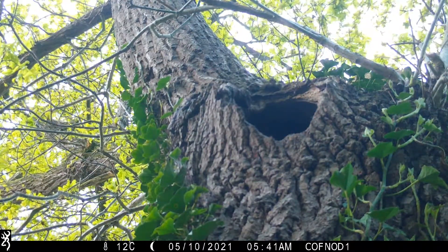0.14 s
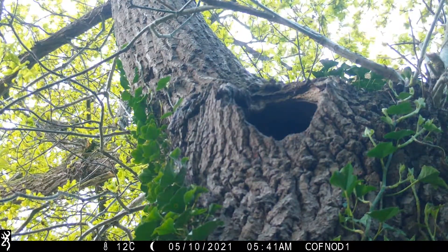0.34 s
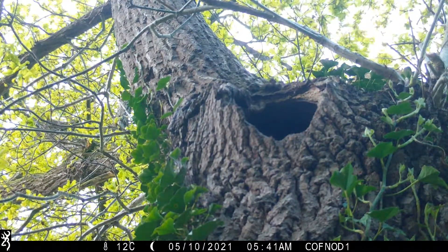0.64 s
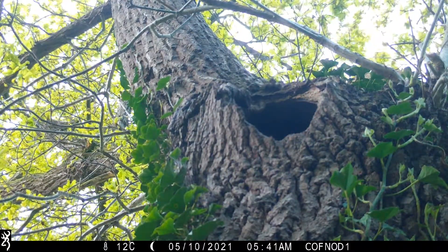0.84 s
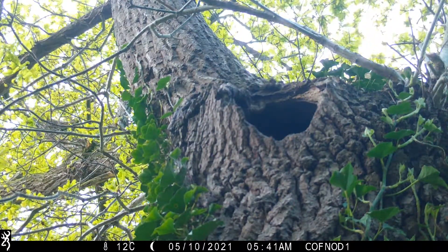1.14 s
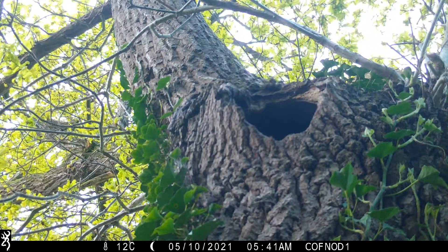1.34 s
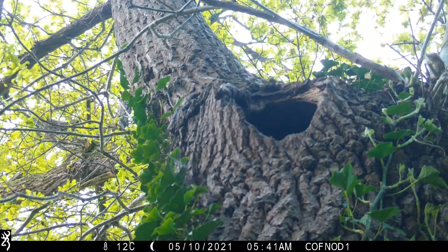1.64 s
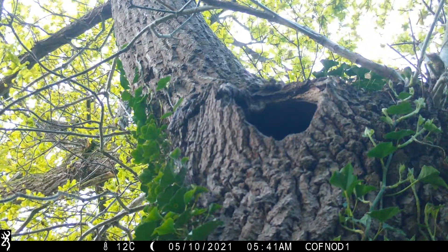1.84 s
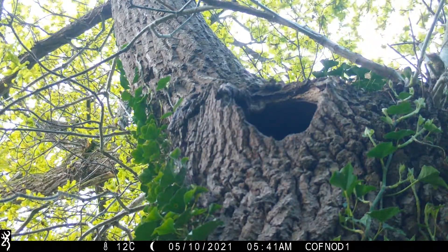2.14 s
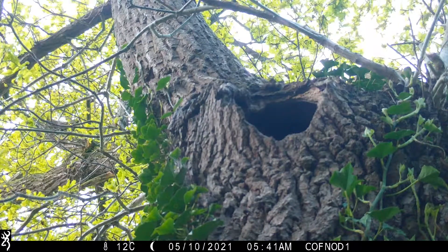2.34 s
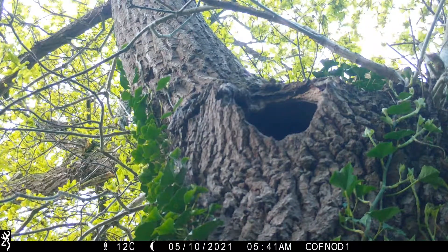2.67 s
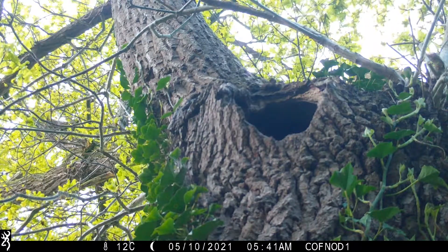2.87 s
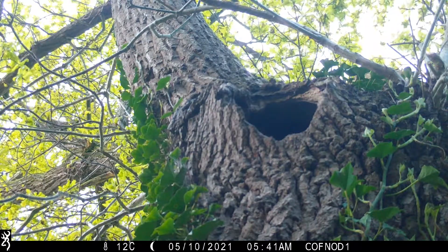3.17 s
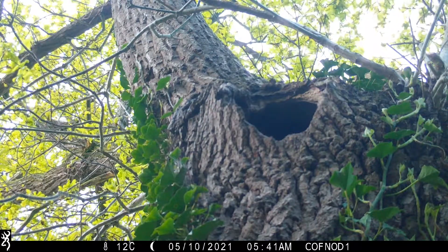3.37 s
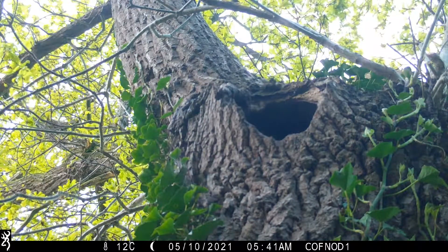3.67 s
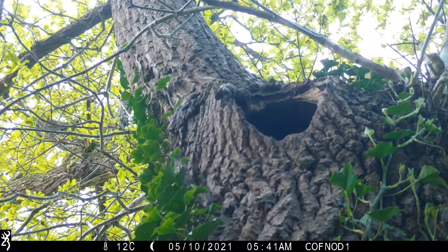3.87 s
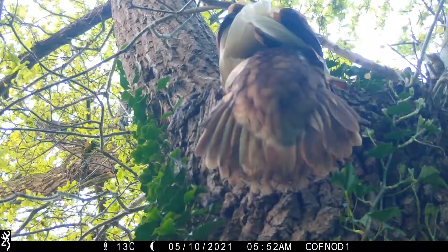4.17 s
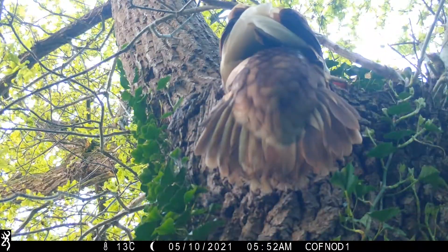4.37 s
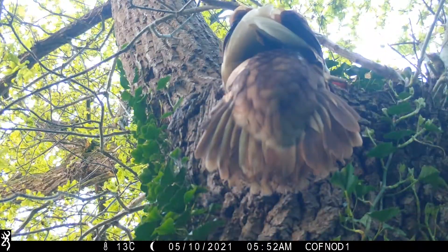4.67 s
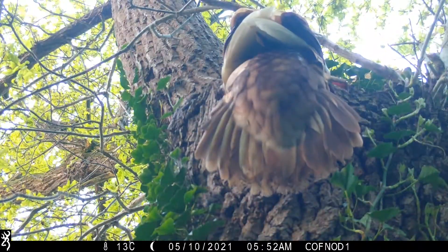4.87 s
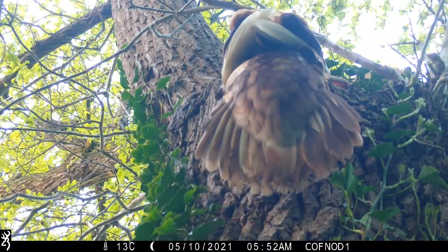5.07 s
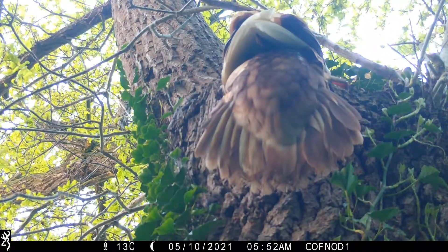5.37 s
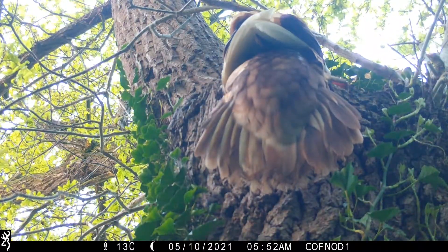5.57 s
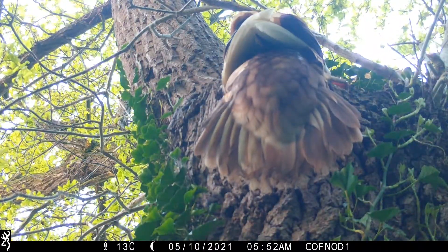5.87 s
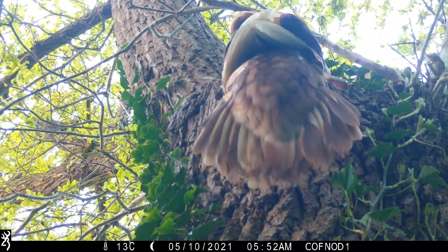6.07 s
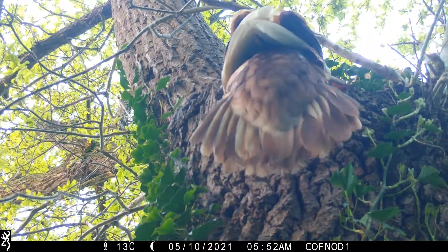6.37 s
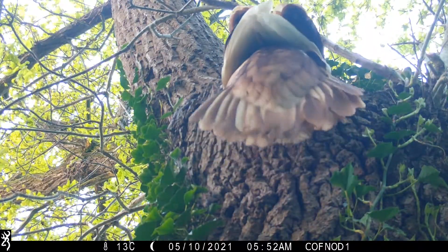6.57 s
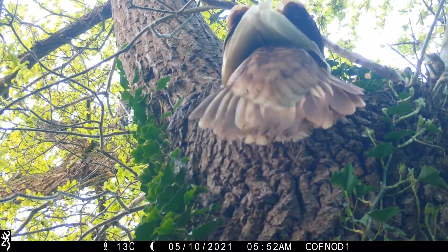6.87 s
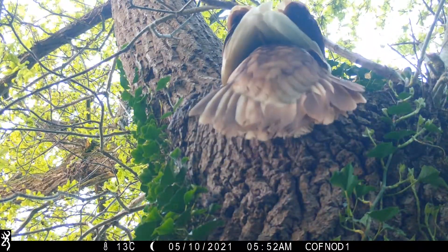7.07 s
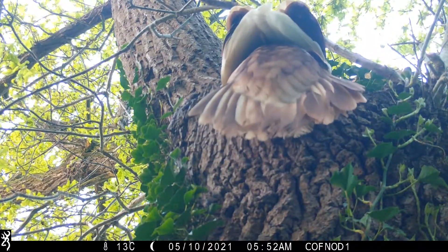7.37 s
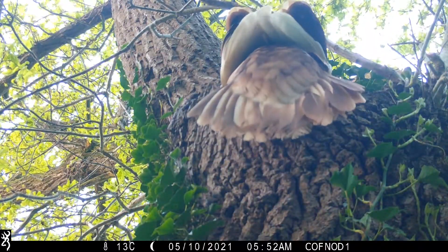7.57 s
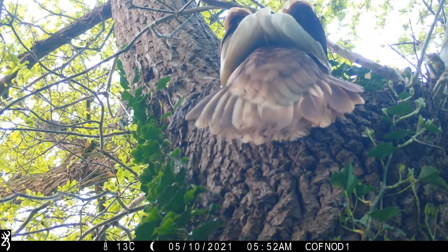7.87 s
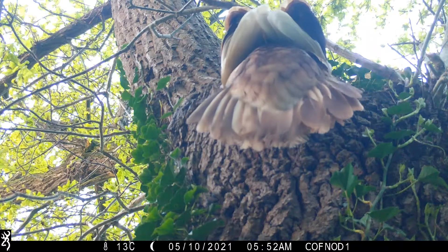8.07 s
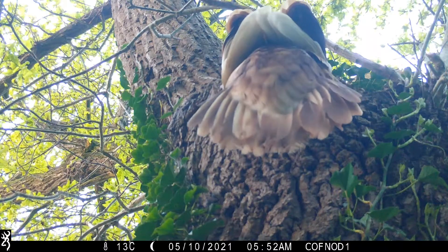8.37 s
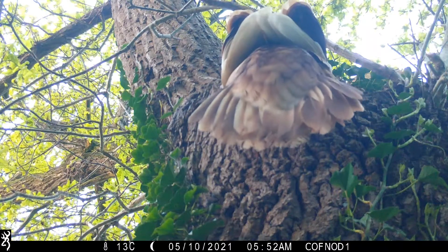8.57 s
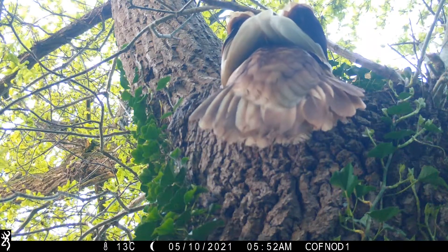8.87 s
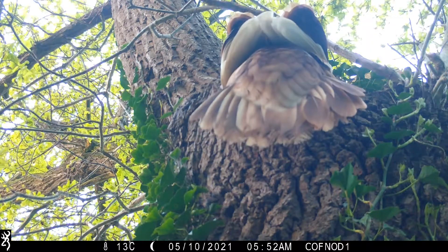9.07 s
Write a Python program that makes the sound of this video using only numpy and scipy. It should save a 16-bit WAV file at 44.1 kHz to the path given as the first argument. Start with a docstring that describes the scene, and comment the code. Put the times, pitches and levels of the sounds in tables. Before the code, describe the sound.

In a wood at dawn, a small boxed microphone on a trunk picks up a steady two-syllable warbler, thin whistles and many faint birds echoing among trees over distant traffic. At about four seconds the sound cuts abruptly and returns louder, with more hiss and a thin high whine. An owl lands with low wing thumps and a sharp claw tap; sparse chirps, then stronger whistles and buzzy notes follow, with a faint far-off sheep bleat.

```python
"""A wood at dawn, heard by a small camera on a trunk: whistles, buzzes and a two-note warbler are gliding near-sines
that echo among the trees, over distant traffic made of coloured noise.
At 4.2 s a cut ends the notes and echoes; after a very short silence the gain is higher. An owl then lands with
wing thumps (gusts of noise) and a claw tap (ringing modes), and a sheep bleats far off (a sum of harmonics).
The camera's own electronics add hiss and a thin whine."""
import sys
import numpy as np
from scipy import signal
from scipy.fft import rfft, irfft
from scipy.io import wavfile
from scipy.ndimage import uniform_filter1d

SR = 44100
rng = np.random.default_rng(int(sys.argv[2]) if len(sys.argv) > 2 else 0)


def wav_out(sig):
    """Save sig, one row per channel (or a flat mono array), as 16-bit PCM at SR to the path in sys.argv[1]."""
    wavfile.write(sys.argv[1], SR, np.round(np.clip(np.atleast_2d(sig).T, -1, 1) * 32767).astype(np.int16))


N = 407043  # length of the scene in samples
# Levels in the tables are those before the microphone's colour and the gain step.
CUT_S = 4.1962  # the moment of the cut
FADE_DB = 2  # level lost over one whistle, other than the warbler's
CHANCE = rng.standard_normal(N)  # source of every bird's unsteadiness


def gain_of(db):
    """Turns decibels into a factor for the wave."""
    return 10 ** (np.asarray(db) / 20)


def evened(x):
    """Scales a sound to an average (rms) strength of 1."""
    return x / np.sqrt(np.mean(x ** 2) + 1e-20)


def read_spectrum(points, hz):
    """Reads values between the points of a spectrum, on a logarithmic frequency axis."""
    point_hz, value = np.transpose(points)
    return np.interp(np.log(hz + 1), np.log(point_hz + 1), value)


def curve(points):
    """Gain at every sample from rows of (time [s], level [dB])."""
    return gain_of(np.interp(np.arange(N) / SR, *np.transpose(points)))


def add(mix, s, sound):
    """Mixes a sound in at s seconds, leaving out what falls outside the scene."""
    start = round(s * SR)
    part = mix[max(start, 0):][:len(sound) + min(start, 0)]
    part += sound[max(-start, 0):][:len(part)]


def coloured(x, points):
    """Makes each frequency louder or softer by a spectrum in dB."""
    hz = np.fft.rfftfreq(len(x), 1 / SR)
    return irfft(rfft(x) * gain_of(read_spectrum(points, hz)), len(x))


def wander(start, count, size):
    """A stretch of slow chance: noise smoothed over size samples."""
    stretch = CHANCE[start % (N // 2):][:count + size]
    return evened(uniform_filter1d(stretch, size=size))[size // 2:][:count]


def whistle(s, hz, db, edge=0.2, fade_db=FADE_DB, waver=0.0049, flutter_db=3.2):
    """A near sine with rounded pitch corners, soft ends, a fade, and unsteady pitch and level."""
    unsteady = wander(round(s * SR), len(hz), size=300)
    hz = uniform_filter1d(hz, size=300, mode="nearest") * (1 + waver * unsteady)
    fade = fade_db * np.linspace(-.5, .5, len(hz))
    level_db = db - fade + flutter_db * unsteady[::-1]
    shape = signal.windows.tukey(len(hz), np.clip(edge, 0, 1)) * gain_of(level_db)
    return np.sqrt(2) * shape * np.sin(2 * np.pi * np.cumsum(hz) / SR)


# Each note below is (start s, level dB, corner times s, corner pitches Hz, fade dB).
def warbler():
    """The see-saw song: two steeply falling syllables, chaff and chiff, in turn."""
    # pitch bends of each syllable: (time after its start [s], pitch [Hz])
    chiff = [(0, 7150), (.012, 5520), (.032, 5250), (.056, 3800), (.07, 3620)]
    chaff = [(0, 7260), (.011, 5050), (.022, 4660), (.072, 4556), (.092, 3540), (.104, 3280)]
    # the song, chaff first: (time [s], level [dB])
    song = [(-.028, -50), (.345, -52.5), (.664, -49.5), (1.045, -51), (1.386, -53), (1.748, -51.5),
            (2.066, -52.5), (2.428, -53.5), (2.75, -54.5)]
    fade_db = 7  # level lost over one syllable
    return [(s, db, *np.transpose(shape), fade_db)
            for shape, calls in ((chaff, song[::2]), (chiff, song[1::2])) for s, db in calls]


def bent_whistles():
    """Whistles that swoop to a pitch, hold it, then slide away."""
    # (time [s], length [s], level [dB], first pitch [Hz], held pitch [Hz], last pitch [Hz],
    #  share of the length at which the hold ends [0-1])
    bent = [(-.02, .195, -38, 2893, 3366, 2570, 0.39), (1.125, .09, -61.5, 2716, 3095, 3060, 0.77),
            (2.06, .15, -62, 7300, 7200, 7480, 0.3), (3.282, .13, -58, 6600, 6000, 6350, .35),
            (3.63, 0.18, -61.5, 3040, 2740, 3360, 0.3), (3.933, 0.16, -62, 4060, 3230, 3590, .5),
            (5.203, 0.077, -65, 3530, 3500, 3080, 0.4), (5.323, .18, -64, 2900, 2754, 2890, .4),
            (6.131, 0.042, -43, 2950, 2813, 2890, 0.7), (6.17, 0.049, -43, 3380, 3422, 2210, .4),
            (6.277, 0.045, -50.5, 5450, 6100, 6260, .6), (6.412, 0.02, -41.5, 3670, 3595, 2954, 0.4),
            (7.039, 0.043, -57.5, 2970, 3170, 2780, 0.6), (7.077, .065, -57.5, 2837, 2720, 2580, 0.5),
            (7.084, .096, -60, 3156, 3760, 2726, .66), (7.461, 0.1, -59, 3630, 3504, 3840, .45),
            (7.481, .042, -44, 2780, 3040, 2530, 0.62), (7.553, .058, -44.5, 3240, 3857, 2840, 0.7),
            (7.988, 0.016, -55.5, 4290, 4400, 4110, 0.5), (8.205, 0.068, -59, 6120, 6600, 6150, .35),
            (8.844, .04, -58.5, 2500, 2816, 2780, .8), (9.076, 0.065, -55, 3257, 3467, 2860, .35)]
    swoop_share = .26  # share of the length spent reaching the held pitch
    notes = []
    for s, length, db, first, held, last, leave in bent:
        corners = np.array([0, swoop_share, np.clip(leave, swoop_share, .95), 1])
        notes.append((s, db, length * corners, (first, held, held, last), FADE_DB))
    return notes


def repeated_calls():
    """Four birds that each repeat one call with the same pitch bends."""
    # pitch bends of each call: (time after its start [s], pitch [Hz])
    tsee = [(0, 7476.5), (.03, 6697)]
    slur = [(0, 5390), (.032, 4940), (.065, 4780)]
    rattle = [(0, 5600), (.02, 4400), (.04, 4350)]
    trill = [(0, 6600), (.014, 7030), (.032, 6900), (.065, 5800), (.098, 4350)]
    # when each is called: (time [s], level [dB])
    tsee_calls = [(0.247, -53), (.4, -51), (3.046, -59), (3.2, -55), (7.232, -60), (7.415, -63)]
    slur_calls = [(2.283, -59), (2.646, -59), (7.058, -57), (7.652, -58.5)]
    rattle_calls = [(6.7, -66), (6.727, -65), (6.802, -65), (6.882, -66), (6.96, -65)]
    trill_calls = [(3.735 + k * 0.15, -55.5) for k in range(4)]  # one each 0.15 s
    birds = (tsee, tsee_calls), (slur, slur_calls), (rattle, rattle_calls), (trill, trill_calls)
    return [(s, db, *np.transpose(shape), FADE_DB) for shape, calls in birds for s, db in calls]


def held_whistles():
    """Whistles on one pitch that sags a little from start to end."""
    # (time [s], length [s], level [dB], pitch [Hz])
    held = [(1.316, 0.088, -59, 2717), (2.82, 0.068, -60.5, 3210), (2.89, 0.052, -69, 4200),
            (3.002, 0.061, -64, 3440), (3.168, 0.12, -56.5, 3300), (3.58, .16, -64, 7400),
            (4.3, .035, -67.5, 3250), (4.333, 0.034, -62.5, 2030), (4.44, .04, -66.5, 3320),
            (4.55, 0.25, -64.5, 4055), (4.586, 0.12, -68, 6100), (5.567, 0.14, -61.5, 4570),
            (5.85, 0.23, -63.5, 5930), (5.857, 0.12, -53, 3830), (6.106, 0.095, -58, 4125),
            (6.755, 0.07, -67.5, 3330), (6.859, 0.067, -62, 3610), (7.178, 0.055, -63, 2787),
            (7.776, 0.033, -57, 3180), (8.948, 0.1, -59, 3473)]
    sag = 0.0058  # starts this share above its pitch and ends as far below
    return [(s, db, (0, length), (hz * (1 + sag), hz * (1 - sag)), FADE_DB) for s, length, db, hz in held]


def chirps():
    """Notes that slide from one pitch to another, a little faster in their first half."""
    # (time [s], length [s], level [dB], first pitch [Hz], last pitch [Hz])
    slides = [(1.324, 0.059, -59.5, 3340, 3980), (1.757, 0.087, -61, 4530, 3320),
              (1.926, 0.02, -57.5, 3040, 2570), (2.085, 0.022, -62, 4200, 3320),
              (2.343, 0.029, -60, 3700, 2680), (2.504, .028, -63.5, 3150, 2630),
              (2.535, 0.013, -61, 3050, 2730), (2.65, 0.082, -63, 2980, 3680),
              (2.705, 0.02, -60, 3340, 2960), (2.849, 0.033, -58, 3230, 2670),
              (3.088, 0.038, -61, 3680, 2470), (3.16, 0.06, -62, 3880, 3580), (3.3, .03, -55.5, 3600, 2550),
              (3.373, 0.032, -58.5, 3090, 2870), (3.444, 0.045, -57.5, 3930, 3480),
              (4.197, 0.024, -53, 2040, 2465), (4.22, .014, -65.5, 2740, 2920),
              (4.322, 0.014, -64, 3050, 2700), (4.326, .032, -63, 2000, 2500),
              (4.376, 0.021, -60, 3870, 3186), (4.489, 0.032, -63.5, 3900, 3060),
              (4.473, 0.033, -62, 1954, 2660), (4.659, 0.018, -60, 2910, 2720),
              (4.83, .035, -63, 2460, 2065), (4.917, 0.11, -67, 2564, 2410),
              (5.036, 0.085, -65, 2337, 2070), (5.078, .075, -67.5, 5600, 3004),
              (5.142, .06, -65, 2790, 3380), (5.2, 0.063, -61.5, 6900, 5050),
              (5.495, 0.095, -61, 3520, 2694), (5.608, .03, -57.5, 5550, 4950),
              (5.669, 0.11, -61.5, 2460, 2200), (6.156, 0.04, -63.5, 4500, 6430),
              (6.274, 0.041, -65, 2820, 3250), (6.556, 0.15, -62, 5530, 5350),
              (6.585, .065, -62, 2540, 2355), (6.62, 0.058, -66, 3300, 2760),
              (6.823, 0.034, -56, 2770, 3280), (7.05, 0.027, -58.5, 3750, 3350),
              (6.925, 0.067, -65, 2584, 2340), (7.947, 0.022, -62, 4800, 4550),
              (8.061, 0.037, -58.5, 1930, 2300), (8.327, 0.021, -59, 6400, 4280),
              (8.491, .028, -58.5, 3290, 3050), (8.994, 0.02, -59, 3332, 2950)]
    halfway = .58  # share of the slide made by half the length
    return [(s, db, (0, length / 2, length), (first, first + halfway * (last - first), last), FADE_DB)
            for s, length, db, first, last in slides]


def songbirds():
    """Sings every near whistle and buzz: the direct sound, and the share sent to the trees."""
    notes = held_whistles() + chirps() + bent_whistles() + repeated_calls() + warbler()
    calls = []
    for s, db, at, pitches, fade_db in notes:
        hz = np.interp(np.arange(0, at[-1], 1 / SR), at, pitches)
        calls.append((s, whistle(s, hz, db, fade_db=fade_db)))
    direct, sent = np.zeros((2, N))
    for s, sound in calls + buzzes():
        heard = sound[:round((CUT_S - s) * SR)] if s < CUT_S else sound  # the cut ends a note
        add(direct, s, heard)
        add(sent, s, heard * gain_of(-3.0))
    return direct, sent


def far_birds(count=1400):
    """Many faint, short notes of random pitch and length, most of them falling."""
    # loudness of the crowd before it is mixed: (time [s], level [dB])
    level = [(0, -64), (4.2, -64), (4.6, -77), (5.4, -74.5), (6.4, -61), (7.3, -72), (9.3, -67.5)]
    out = np.zeros(N)
    for when, pitch, glide, length, size in rng.random((count, 5)):
        s = when * N / SR
        samples = round((.012 + .025 * length) * SR)
        first_hz = 2750 * 2.2 ** pitch ** 1.4
        hz = first_hz * np.geomspace(1, .75 + 0.3975 * glide, samples)
        add(out, s, whistle(s, hz, 12 * size, edge=0.67))
    return curve(level) * evened(out)


def traffic():
    """Distant traffic as a wash of noise that is dull in tone and slowly changes level."""
    # colour of the wash: (frequency [Hz], level per Hz [dB])
    colour = [(30, -0.5), (1100, 0), (1700, -7.5), (2500, -10), (3400, -15.5), (8000, -14.5)]
    # its loudness: (time [s], level [dB])
    level = [(0, -52.5), (4.21, -53), (5.3, -54.5), (5.65, -50.5), (6, -53.5), (9.3, -53.5)]
    return curve(level) * evened(coloured(rng.standard_normal(N), colour))


def wood(x, build_s=0.0064):
    """Trunks scatter sound: sparse taps of random sign build up, and each band dies at its own speed."""
    # how long the echo lasts: (frequency [Hz], time to fall by 60 dB [s])
    decay = [(1000, 0.54), (5000, 0.66), (8000, 0.41)]
    slots = np.arange(0, SR - 20, 20)  # one tap in every 20 samples
    at = slots + rng.integers(0, 20, len(slots))
    taps = np.zeros(SR)
    taps[at] = rng.choice([-1., 1.], len(at)) * (1 - np.exp(-at / SR / build_s))
    hz, t, bands = signal.stft(taps, SR, nperseg=256)
    fading = gain_of(-60 * t / read_spectrum(decay, hz)[:, None])
    tail = signal.istft(bands * fading, SR, nperseg=256)[1]
    return signal.fftconvolve(x, tail / np.linalg.norm(tail))[:N]


def owl():
    """Wing beats push rough gusts at the microphone; a claw taps the bark, whose two close modes beat."""
    # gusts of air: (time of the peak [s], level at the peak [dB], top frequency [Hz])
    wings = [(4.27, -42.5, 110), (4.319, -43.5, 160), (4.38, -40.5, 65), (4.46, -49.5, 90.4),
             (4.609, -46.5, 80), (5.96, -44.5, 60)]
    # ringing of the tapped bark: (frequency [Hz], level [dB], time to fall by 60 dB [s])
    bark = [(2790, -20, 0.018), (3060, -29, 0.018), (4740, -37.5, 0.0087), (6280, -27.5, 0.0066),
            (9200, -18, .004)]
    claw_s = 4.2533
    out, t = np.zeros(N), np.arange(round(.09 * SR)) / SR
    for s, db, top_hz in wings:
        air = rng.standard_normal(len(t))
        gust = evened(signal.lfilter(*signal.butter(3, max(top_hz, 20), fs=SR), air))
        swell = np.exp(-((t - .04) / .016) ** 2)  # peaks 0.04 s in
        add(out, s - .04, gain_of(db) * swell * gust)
    strike = 1 - np.exp(-t / 0.00032)  # soft first instant of the tap
    ringing = sum(gain_of(db - 60 * t / t60) * np.sin(2 * np.pi * hz * t) for hz, db, t60 in bark)
    add(out, claw_s, strike * ringing)
    return out


def buzz(s, hz, db, depth):
    """The pitch swings unevenly, over a hundred times a second at first, then slower; each swing is one throb."""
    swings_per_s = 125 - 80 * np.arange(len(hz)) / SR
    pace = swings_per_s * (1 + 0.301 * wander(round(s * SR), len(hz), size=500))
    angle = 2 * np.pi * np.cumsum(pace) / SR
    throb = 1 + .48 * np.sin(angle - 1.42)  # loudness trails the pitch swing by 1.42 radians
    shape = signal.windows.tukey(len(hz), .03) * gain_of(db) * throb
    depth = depth * (1 + 0.33 * wander(round(s * SR) + SR, len(hz), size=200))  # swings reach unevenly far
    return np.sqrt(2) * shape * np.sin(2 * np.pi * np.cumsum(hz + depth * np.sin(angle)) / SR)


def buzzes():
    """Every buzzed note as (start s, sound), its pitch, level and swing gliding between table rows."""
    # one table for each note: (time [s], centre pitch [Hz], level [dB], average swing of the pitch [Hz])
    buzzed_notes = [
        [(5.726, 4200, -58.5, 500), (5.75, 3510, -53, 200), (5.79, 3303, -45, 70), (5.82, 3480, -49, 59)],
        [(5.965, 3806, -44.5, 248), (6.0, 3934, -47.5, 430), (6.05, 3960, -47, 434)],
        [(6.52, 4300, -55.5, 100), (6.555, 3900, -49, 300), (6.585, 3617, -45.5, 220), (6.63, 3694, -55, 100)],
        [(6.108, 3200, -50, 250), (6.136, 2935, -44, 151)],
        [(6.304, 4300, -51, 604), (6.328, 4470, -50, 600)],
        [(7.912, 3297, -50.5, 221), (8.0, 3130, -49.5, 223), (8.1, 3248, -47, 204), (8.17, 3428, -47.5, 130.4),
         (8.24, 3319, -44, 120), (8.28, 2832, -40.5, 40.2)],
        [(8.414, 2134, -56, 120), (8.48, 2020, -65.5, 152)],
        [(8.578, 3844, -64.5, 250), (8.7, 4400, -63.5, 200)],
    ]
    calls = []
    for rows in buzzed_notes:
        s, *columns = np.transpose(rows)
        t = np.arange(s[0], s[-1], 1 / SR)
        hz, db, depth = (np.interp(t, s, column) for column in columns)
        calls.append((s[0], buzz(s[0], hz, db, depth)))
    return calls


def sheep():
    """A trembling voice of harmonics; only those around the mouth resonances carry this far."""
    # the bleat: (time [s], pitch [Hz], level before the tremble [dB])
    bleat = [(7.4, 172, -65.5), (7.6, 181.6, -62), (7.85, 181.3, -55.5), (8.049, 177.6, -58),
             (8.25, 175, -72)]
    # resonances of the wide-open mouth: (frequency [Hz], width [Hz], level [dB])
    resonances = [(1445, 150, 0), (1870, 370, -9)]
    s, *columns = np.transpose(bleat)
    t = np.arange(s[0], s[-1], 1 / SR)
    hz, db = (np.interp(t, s, column) for column in columns)
    turns = np.cumsum(hz) / SR
    mouth = np.interp(t - s[0], (0, .25), (.85, 1))  # opens over 0.25 s, raising the resonances
    voice = np.zeros(len(t))
    for k in range(5, 14):  # number of the harmonic
        for resonance_hz, width, top_db in resonances:
            strength = gain_of(top_db) / np.hypot(1, 2 * (k * hz - resonance_hz * mouth) / width) ** 2
            voice += strength * np.sin(2 * np.pi * k * turns)
    tremble = 1 + 0.54 * np.sin(2 * np.pi * 11 * t)  # 11 times a second
    out = np.zeros(N)
    add(out, s[0], gain_of(db) * evened(voice) * tremble * signal.windows.tukey(len(t), .1))
    return out


def scene():
    """Near birds and sheep with echoes, far birds mostly as echo, traffic and owl; the cut ends the first echoes."""
    near, sent = songbirds()
    far, bleat = far_birds(), sheep()
    sent = sent + gain_of(-0.6) * far + gain_of(-6.4) * bleat
    before = np.arange(N) < CUT_S * SR
    echo = before * wood(sent * before) + wood(sent * ~before)
    return (near + gain_of(-5) * far + bleat + echo + traffic() + owl())[None]


def record(dry):
    """Microphone colour, circuit hiss and whine, a short silence and gain step at the cut, then the band limit."""
    # colour of a microphone behind a small hole in the case: (frequency [Hz], level [dB])
    microphone = [(30, -20.5), (150, -10.5), (700, -0.5), (1500, 1.5), (2400, 3.5), (2900, 5), (3400, 8),
                  (3800, 3), (4200, -2.5), (5100, -15.5), (6600, -25.5), (8000, -37.5), (15000, -50.5)]
    resume_s, louder_db = 4.2012, 15  # end of the silence, and the gain step
    whine_hz, flip_cycles_hz = 7797.5, 29.6
    t = np.arange(N) / SR
    # the whine's polarity flips twice a cycle, which splits its line
    flips = np.tanh(8.0 * np.sin(2 * np.pi * flip_cycles_hz * t)) + .2
    whine = gain_of(-88.0) * flips * np.sin(2 * np.pi * whine_hz * t)
    whine += gain_of(-107) * np.sin(4 * np.pi * whine_hz * t)  # its octave
    hiss = gain_of(-87.5) * rng.standard_normal(N)
    x = coloured(np.pad(dry[0], (0, SR // 10)), microphone)[:N] + whine + hiss
    x = x * np.where(t < CUT_S, 1, gain_of(louder_db) * (t > resume_s))
    band_limit = signal.firwin(511, 15700, window=("kaiser", 9), fs=SR)  # little passes above 15700 Hz
    return signal.oaconvolve(x, band_limit, "same")[None]


dry = scene()
out = record(dry)
wav_out(out)
```